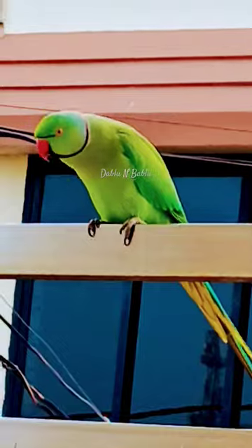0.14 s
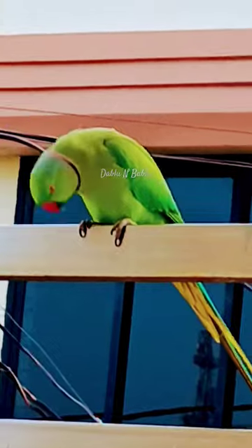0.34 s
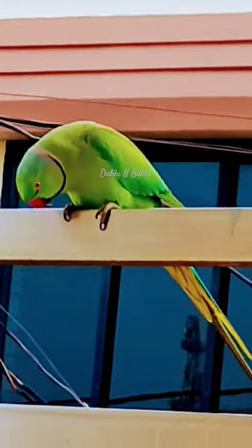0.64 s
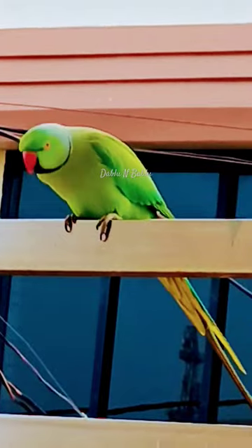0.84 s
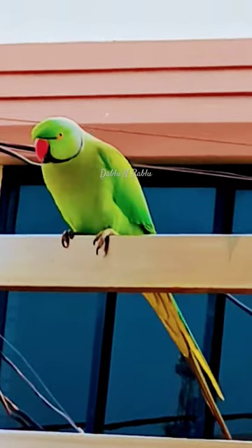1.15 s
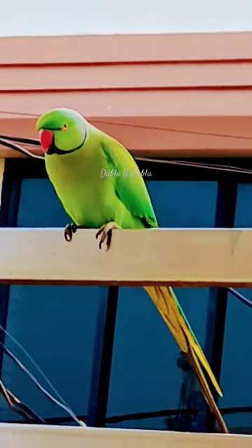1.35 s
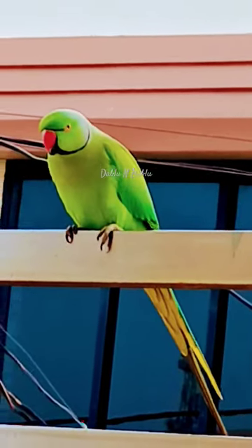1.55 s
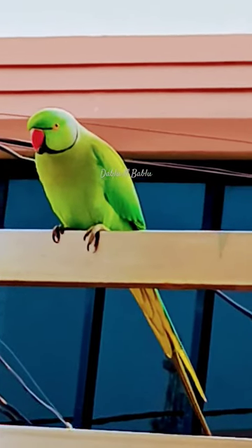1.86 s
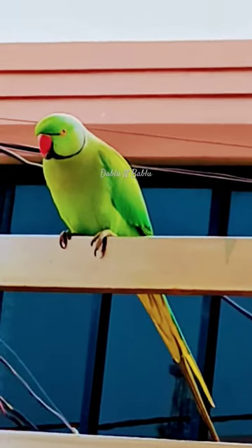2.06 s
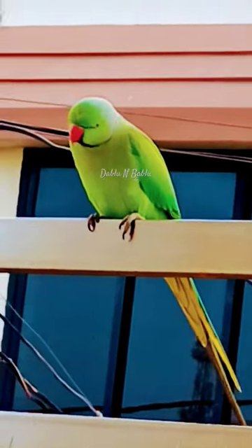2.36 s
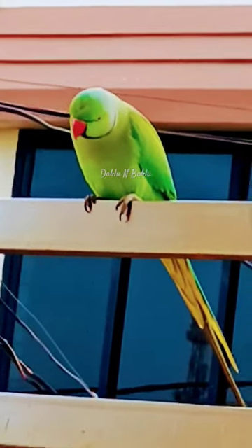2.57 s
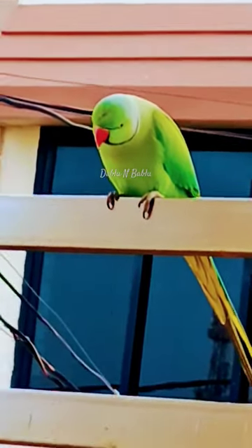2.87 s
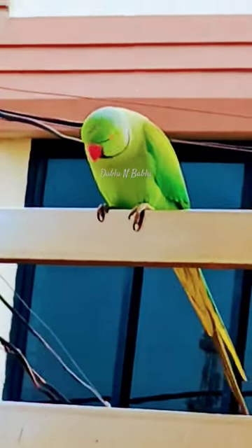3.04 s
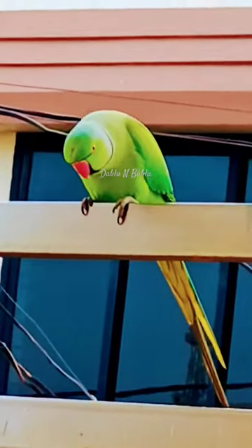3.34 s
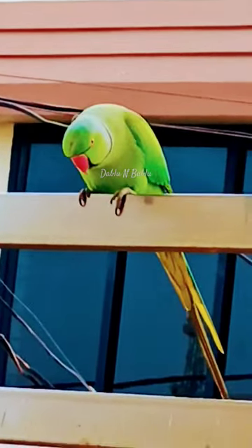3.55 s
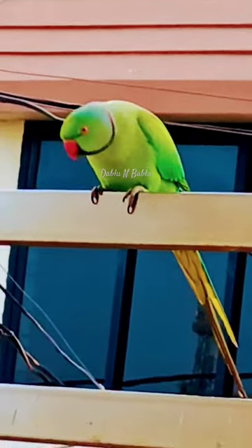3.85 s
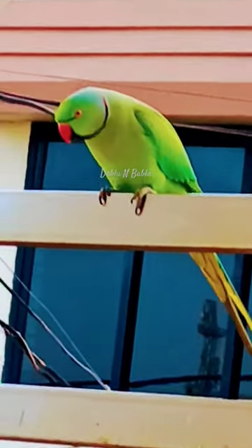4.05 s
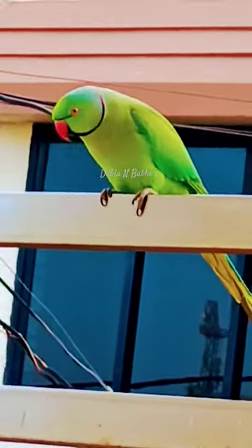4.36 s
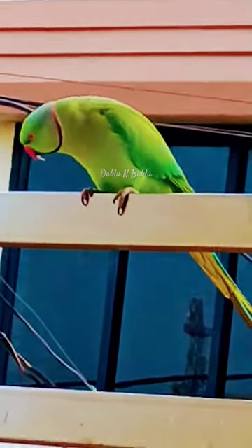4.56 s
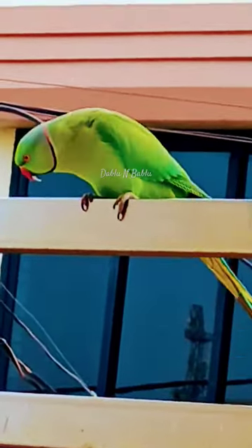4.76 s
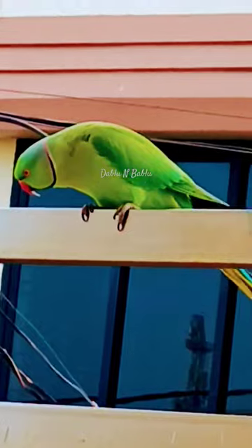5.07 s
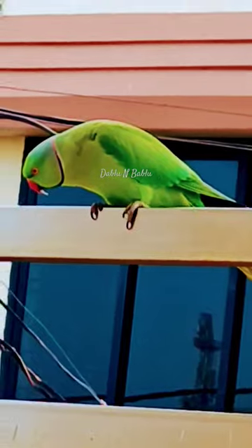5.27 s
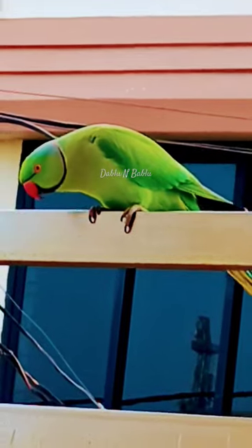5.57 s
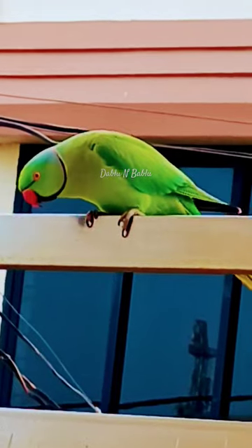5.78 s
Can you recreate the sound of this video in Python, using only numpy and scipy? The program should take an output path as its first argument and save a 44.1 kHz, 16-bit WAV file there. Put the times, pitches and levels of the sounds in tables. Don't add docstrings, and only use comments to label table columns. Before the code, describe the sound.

The first 0.13 seconds are silent, then a steady low traffic rumble with faint airy hiss fades in quickly. At 0.5 a close parakeet gives a short croak, a loud piercing whistle and a raspy falling squawk ending in a croak by 0.75. At 1.0 a quick upward scoop breaks into a longer descending squawk, until about 1.25. Walls return short smeared echoes and a brief diffuse tail. From 1.4 to 3.15 the bird only shifts, with small dry claw and feather scrapes; tiny soft dove hoots sit far away around 1.8 to 2.3. At 3.25 a rough overlapping squawk bursts out, followed by faint grunts, then scoop-and-fall squawks at 3.7, 4.0 and 4.27. From 4.6 come scrapes, a faint wavering peep and low muttering, clearer near 5.3. At 5.8 a hoarse level note swells into the cut as traffic rises slightly.

```python
import sys
import numpy as np
from scipy import signal
from scipy.fft import rfft, irfft, next_fast_len
from scipy.io import wavfile
from scipy.ndimage import uniform_filter1d

SR = 44100
rng = np.random.default_rng(int(sys.argv[2]) if len(sys.argv) > 2 else 0)


def output_pcm(signal):
    pcm = np.clip(np.atleast_2d(signal).T, -1, 1) * 32767
    wavfile.write(sys.argv[1], SR, np.round(pcm).astype(np.int16))


def gain_from_db(level_db):
    decades = np.asarray(level_db, float) / 20
    return 10 ** decades


N = 260631

# frequency in Hz, gain in dB.
THROAT_HZ_DB = [(900, -22), (1500, -5.5), (2400, 1.5), (3300, -2), (4200, 0), (5300, -8.5), (6500, -13.5),
                (8000, -0.5), (9500, -8.5), (12000, -8.5), (15500, 3.5)]

# start in seconds, length in seconds, first pitch in Hz, last pitch in Hz, level in dB.
SCOOP_NOTES = [
    (0.994, .047, 1302, 2270, -19.5),
    (3.688, 0.051, 1444, 2460, -21.5),
    (3.968, .05, 1312, 2210, -23.5),
    (4.25, 0.046, 1347, 2103, -23.5),
]
SWEEP_NOTES = [
    (0.599, .076, 2119, 1540, -9.5),
    (1.04, 0.11, 2219, 1297, -12.5),
    (1.115, 0.031, 2156, 1984, -18.5),
    (1.148, .086, 1988, 1301, -18.5),
    (3.326, .056, 2255, 1420, -13.5),
    (3.737, .076, 2155, 1333, -15),
    (4.017, 0.074, 2161, 1433, -14.5),
    (4.292, 0.085, 2138, 1369, -15),
]
WHISTLE_NOTES = [
    (0.535, 0.072, 3215, 2880, -8.5),
]
HOLD_NOTES = [
    (3.262, 0.035, 1800, 1733, -20),
    (3.29, 0.049, 2450, 2440, -19.5),
    (3.335, .062, 1950, 1880, -20),
]
CROAK_NOTES = [
    (0.499, 0.038, 1873, 1860, -22),
    (0.672, .085, 1660, 1330, -16.5),
    (3.238, 0.059, 1455, 1474, -24.5),
    (3.66, 0.049, 1157, 1300, -34.5),
    (5.44, 0.069, 1200, 1120, -40),
]
GRUNT_NOTES = [
    (3.48, 0.058, 1394, 1718, -36.5),
    (3.56, 0.069, 1875, 1588, -29.5),
    (3.657, 0.061, 1696, 1692, -27),
]

# time in seconds, pitch in Hz, level in dB, beak opening in dB per octave.
ARCH_PATHS = [
    [(4.093, 1547, -21, -9), (4.12, 1843, -27, -7), (4.15, 1940, -26.5, -8), (4.18, 1950, -31.5, -13),
     (4.2, 1880, -32, -13), (4.22, 1920, -41, -11), (4.245, 1900, -46, -13)],
]
PEEP_PATHS = [
    [(4.74, 1933, -42, -6), (4.764, 2045, -35, -7), (4.78, 1863, -33, -4), (4.805, 1850, -32, -1),
     (4.818, 1670, -32, -5), (4.826, 1908, -42, -6), (4.84, 1645, -40, -6), (4.87, 2120, -50, -6)],
]
CHAT_PATHS = [
    [(4.67, 940, -42, -6), (4.692, 1316, -36, -1), (4.725, 1370, -41.5, -8), (4.735, 1380, -44, -9)],
    [(5.255, 1004, -35, -4), (5.27, 1290, -37, -7), (5.282, 1514, -31.5, -4.5), (5.315, 1502, -32.5, -5),
     (5.335, 1340, -31, 3)],
    [(5.33, 1358, -28, -1), (5.34, 1344, -25, 2), (5.375, 1436, -27.5, 1.5), (5.40, 1417, -27, 1),
     (5.43, 1315, -31, 1), (5.445, 1186, -35, -12), (5.47, 1183, -37, -10)],
    [(5.808, 805, -40, -10), (5.824, 1087, -34.5, 0.5), (5.833, 1394, -27, -0.5), (5.87, 1410, -19.5, 4.5),
     (5.93, 1370, -18, 4.5)],
]

SCOOP = dict(bend=.7, ease=0.837, swell_db=-9, swell_s=0.017, sag_db=-0.5, release_db=4, release_s=.008, open_db=-5, opening_db=2, first_db=-11.5, rough=.55, roughening=-.05, throb=0.071, half=.08, breath_db=-13.5, rasp=0.5, treble_db=-1.5)
SWEEP = dict(bend=1.2, ease=-0.198, swell_db=-7, swell_s=0.0048, sag_db=-4.5, release_db=-10.5, release_s=0.017, open_db=-7, opening_db=3, first_db=-14, rough=.3, roughening=0.09, throb=0.23, half=0.019, breath_db=-24.5, rasp=0.022, treble_db=3.5)
WHISTLE = dict(bend=0.706, ease=.05, swell_db=1, swell_s=0.0051, sag_db=-7.5, release_db=-4, release_s=0.013, open_db=5, opening_db=-18, first_db=15, rough=0.14, roughening=0.5, throb=0.45, half=0, breath_db=-20.5, rasp=0.014, treble_db=6.5)
HOLD = dict(bend=0.86, ease=.05, swell_db=4, swell_s=0.0075, sag_db=-4.5, release_db=1, release_s=.012, open_db=-6, opening_db=-9, first_db=-16, rough=0.53, roughening=.05, throb=0.18, half=0.088, breath_db=-14, rasp=0.18, treble_db=0)
CROAK = dict(bend=.9, ease=0.046, swell_db=4, swell_s=0.0056, sag_db=-3, release_db=-14, release_s=0.015, open_db=1.5, opening_db=1.5, first_db=-1, rough=0.44, roughening=-0.046, throb=.2, half=.12, breath_db=-7, rasp=.35, treble_db=-11.5)
GRUNT = dict(bend=0.82, ease=0.072, swell_db=-7.5, swell_s=0.019, sag_db=-2, release_db=-10, release_s=0.024, first_db=22.5, open_db=-1.5, opening_db=7, rough=0.39, roughening=.05, throb=0.12, half=0.35, breath_db=-2, rasp=0.38, treble_db=-14)
ARCH = dict(first_db=-6, rough=0.27, roughening=.1, throb=0.27, half=.03, breath_db=-28, rasp=0.33, treble_db=-11)
PEEP = dict(first_db=16.5, rough=0.42, roughening=0.44, throb=0.41, half=0.039, breath_db=-17, rasp=0.25, treble_db=-10)
CHAT = dict(first_db=5, rough=0.24, roughening=.05, throb=0.22, half=.03, breath_db=-14.5, rasp=0.29, treble_db=-19)

# time in seconds, throb of a slower second oscillator in Hz,
# treble in dB as the beak turns, fundamental in dB as the neck stretches, pitch-halving strain 0-1.
POSTURE = [(0.534, 86.3, 5.5, 0.5, 0.03), (0.602, 40.6, -5, 4.5, 0), (0.672, 62.4, 4, -7, 0.1),
           (1.04, 90.2, -9, 4.5, 0.04), (1.13, 68.8, 1.5, -3.5, 0), (3.261, 185, 9, -21, 0.4),
           (3.29, 103, 10, 0, 0), (3.33, 106.5, 2, -7.5, 0.29), (3.741, 71.4, 0, -1, 0.18),
           (4.02, 77, -3.5, 1, 0.31), (4.09, 134.7, -6, 1.5, 0.04), (4.291, 66.1, -1, -2, 0),
           (4.67, 80.6, -7, 7, 0), (4.75, 58.3, -6, 2, 0), (5.26, 302, -14, 0, 0.06),
           (5.33, 296, -10, -1, 0.1), (5.81, 399, -22, -3.5, 0)]

# start in seconds, peak in dB, decay in seconds.
RUSTLES = [(0.466, -43, 0.018), (1.37, -39, 0.024), (2.07, -39, 0.014), (2.286, -37, 0.035),
           (2.421, -34.5, 0.054), (2.56, -39, 0.016), (2.703, -38, 0.019), (2.934, -40, 0.026),
           (3.077, -38, 0.03), (3.142, -40.5, 0.02), (4.6, -36.5, 0.053), (4.767, -39, 0.036),
           (4.861, -35, 0.027), (5.007, -38, 0.02), (5.207, -34, 0.029), (5.592, -39, 0.03)]

# delay in seconds, level in dB.
ECHOES = [(.011, -6), (.023, -9.5), (0.043, -17), (.062, -25), (.088, -19.5)]

# start in seconds, length in seconds, pitch in Hz, level in dB.
COOS = [
    (1.8, 0.063, 516, -39),
    (1.916, 0.066, 613, -37.5),
    (2.223, 0.099, 611, -38),
]

# frequency in Hz, density in dB per Hz.
TOWN_HZ_DB = [(25, -100), (50, -90), (80, -68.5), (115, -66), (165, -73), (230, -65), (320, -64),
              (500, -68), (800, -75.5), (1300, -79), (2000, -81), (3200, -89.5), (8000, -96.5),
              (12000, -95.5), (15500, -82.5)]

# time in seconds, gain in dB.
BASS_SWELL_S_DB = [
    (.15, 2.5),
    (1.2, 1),
    (2.1, 2),
    (2.7, 0),
    (3.5, -1),
    (4.4, 0.5),
    (5.1, 0.5),
    (5.9, 3),
]

# frequency in Hz, gain in dB.
TREBLE_HZ_DB = [(4650, -1), (4950, -8), (5900, -7), (6250, 2.5), (8500, -4.5), (8800, -23.5), (10000, -25.5),
                (11400, -44), (11600, -15.5), (13000, -22), (15000, -21.5), (15620, -37), (15780, -57)]


def curve(hz, table):
    f, db = np.transpose(table)
    return gain_from_db(np.interp(np.log(np.maximum(hz, 1)), np.log(f), db))


def colour(x, table):
    n = next_fast_len(len(x))
    hz = np.arange(n // 2 + 1) * SR / n
    return irfft(rfft(x, n) * curve(hz, table), n)[:len(x)]


def walk(rate_hz, count):
    k = max(int(SR / rate_hz), 2)
    w = rng.standard_normal(count + 4 * k)
    w = uniform_filter1d(uniform_filter1d(w, k), k)[2 * k:2 * k + count]
    return w * np.sqrt(1.72 * k)


def add(out, start_s, x):
    i = int(start_s * SR)
    out[i:i + len(x)] += x[:len(out) - i]


def parakeet():
    ruled = ((SCOOP_NOTES, SCOOP), (SWEEP_NOTES, SWEEP), (WHISTLE_NOTES, WHISTLE),
             (HOLD_NOTES, HOLD), (CROAK_NOTES, CROAK), (GRUNT_NOTES, GRUNT))
    free = ((ARCH_PATHS, ARCH), (PEEP_PATHS, PEEP), (CHAT_PATHS, CHAT))
    notes = [(glide(*row, kind), kind) for rows, kind in ruled for row in rows]
    notes += [(path, kind) for paths, kind in free for path in paths]
    out = np.zeros(N)
    for path, kind in notes:
        add(out, path[0][0], sing(path, kind))
    return out


def glide(start_s, length_s, first_hz, last_hz, db, kind):
    u = np.linspace(0, 1, 24)
    t = u * length_s
    way = u ** kind["bend"]
    way = way + kind["ease"] * (way ** 2 * (3 - 2 * way) - way)
    swell_db = kind["swell_db"] * np.clip(1 - t / kind["swell_s"], 0, 1)
    release_db = kind["release_db"] * np.clip(1 - (length_s - t) / kind["release_s"], 0, 1)
    level_db = db + kind["sag_db"] * u + swell_db + release_db
    open_db = kind["open_db"] + kind["opening_db"] * u
    return np.transpose([start_s + t, first_hz + (last_hz - first_hz) * way, level_db, open_db])


def sing(path, kind):
    s, hz, db, open_db = np.transpose(path)
    u = (s - s[0]) / (s[-1] - s[0])
    times, *posture = np.transpose(POSTURE)
    throb_hz, facing_db, neck_db, strain = (np.interp(s[0], times, c) for c in posture)
    first_db = kind["first_db"] + neck_db + 0 * u
    rough = kind["rough"] + kind["roughening"] * u ** 2
    rows = np.transpose([s, hz, db, first_db, open_db, rough])
    return membrane(rows, throb_hz, kind["throb"], kind["half"] + strain, kind["breath_db"],
                    kind["rasp"], kind["treble_db"] + facing_db)


def membrane(rows, throb_hz, throb, half, breath_db, rasp, facing_db):
    s, *columns = np.transpose(rows)
    n = 8192
    t = s[0] + np.arange(n) / SR
    hz, db, first_db, open_db, rough = (np.interp(t, s, c) for c in columns)
    flap = rasp * np.exp(-((t - s[0]) / 0.04) ** 2)
    rough = np.clip(rough + flap, 0, 1)
    slow = 2 * np.pi * np.cumsum(throb_hz * (1 + 0.019 * walk(37, n))) / SR
    waver = 1 + 0.012 * np.sin(slow) + 0.0206 * rough * walk(193, n)
    hz = uniform_filter1d(hz, 150) * waver
    phase = 2 * np.pi * np.cumsum(hz) / SR

    stack, power = 0, 0
    for k in range(1, 12):
        beak = gain_from_db(open_db * np.log2(k / 2) if k > 1 else first_db)
        gain = curve(k * hz, THROAT_HZ_DB) * beak * (k * hz < 16000)
        smear = np.clip(rough * (0.15 + 0.19 * k) + flap, 0, 0.95)
        grain_hz = 300 + 100 * k
        grain = (walk(grain_hz, n) + 1j * walk(grain_hz, n)) / np.sqrt(2)
        envelope = np.sqrt(1 - smear ** 2) + smear * grain
        stack = stack + gain * (envelope * np.exp(1j * (k * phase + k * k))).imag
        power = power + gain ** 2 / 2
    stack = stack / np.sqrt(power) * (1 + half * np.sin(phase / 2))

    breath = colour(rng.standard_normal(n) * (1 + 0.82 * np.sin(phase)), THROAT_HZ_DB)
    air = gain_from_db(breath_db + 8 * rough) + 0.8 * flap
    voice = (stack + air * breath / breath.std()) / np.sqrt(1 + air ** 2)
    voice = colour(voice, [(7300, 0.031), (8300, facing_db / 2), (11000, facing_db)])
    attack = (t - s[0]) / (0.0041 + 0.008 * rasp)
    edge = np.clip(np.minimum(attack, (s[-1] - t) / 0.0051), 0, 1)
    return voice * (1 - throb * np.cos(slow)) * edge * gain_from_db(db + 2.12 * walk(147, n))


def rail():
    out = np.zeros(N)
    t = np.arange(4096) / SR
    for start_s, db, decay_s in RUSTLES:
        scrape = np.diff(rng.standard_normal(len(t) + 1)) * gain_from_db(2.3 * walk(450, len(t)))
        shape = np.exp(-t / decay_s) * np.minimum(t / 0.0074, 1)
        add(out, start_s, gain_from_db(db + 2) * scrape * shape / 2)
    return out


def balcony(x):
    tail_db, low_t60_s, top_t60_s, low_hz, stir_hz = -8.5, 0.64, 0.32, 6340, 800
    t = np.arange(SR) / SR
    lowpass = signal.butter(2, low_hz, fs=SR, output="sos")
    low = signal.sosfilt(lowpass, rng.standard_normal(SR)) * gain_from_db(-60 * t / low_t60_s)
    top = 1.48 * rng.standard_normal(SR) * gain_from_db(-60 * t / top_t60_s)
    tail = (low + top) * np.minimum(t / 0.01, 1)
    walls = np.zeros(SR)
    for delay_s, db in ECHOES:
        smear = rng.standard_normal(300) * np.exp(-np.arange(300) / 60)
        add(walls, delay_s, gain_from_db(db) * smear / np.sqrt(np.sum(smear ** 2)))
    stirred = x * walk(stir_hz, N)
    diffuse = signal.fftconvolve(stirred, gain_from_db(tail_db) * tail / np.sqrt(np.sum(tail ** 2)))
    return x + (signal.fftconvolve(x, walls) + diffuse)[:N]


def dove():
    out = np.zeros(N)
    for start_s, length_s, hz, db in COOS:
        t = np.arange(int(length_s * SR)) / SR
        swell = np.sin(np.pi * t / length_s)
        add(out, start_s, gain_from_db(db) * np.sqrt(2) * swell * np.sin(2 * np.pi * hz * t))
    return out


def town():
    n = next_fast_len(N)
    hz = np.arange(n // 2 + 1) * SR / n
    spectrum = rfft(rng.standard_normal(n)) * curve(hz, TOWN_HZ_DB) * np.sqrt(SR / 2)
    place = 2 * np.log2(np.maximum(hz, 1) / 30)
    bass_db = np.interp(np.arange(N) / SR, *np.transpose(BASS_SWELL_S_DB))
    swell, gust = walk(0.69, N), walk(6.02, N)
    out = 0
    for k in range(19):
        band = irfft(spectrum * np.sqrt(np.clip(1 - abs(place - k), 0, 1)), n)[:N]
        shared_db = bass_db * np.exp(-k / 8) + 0.14 * swell + (0.46 + 0.0033 * k ** 2) * gust
        out = out + band * gain_from_db(shared_db + 0.56 * walk(6.3, N))
    return out


def scene():
    return (balcony(parakeet() + rail()) + dove() + town())[None]


def low_pass(x):
    return signal.sosfilt(signal.butter(12, 16130, fs=SR, output="sos"), x)


def record(dry):
    start_s, fade_s = 0.13, 0.012
    duck_db, duck_slope, duck_s = -16.5, 0.53, 0.025
    start = np.clip((np.arange(N) / SR - start_s) / fade_s, 0, 1) ** 2
    x = colour(dry[0], TREBLE_HZ_DB)
    loudness = np.sqrt(uniform_filter1d(x ** 2, int(duck_s * SR)) + 1e-12)
    gain = np.maximum(loudness / gain_from_db(duck_db), 1) ** -duck_slope
    return low_pass((x * gain * start)[None])


dry = scene()
out = record(dry)
output_pcm(out)
```